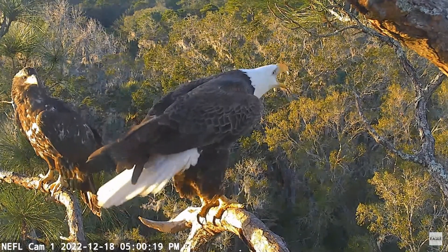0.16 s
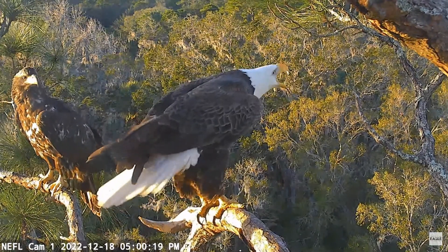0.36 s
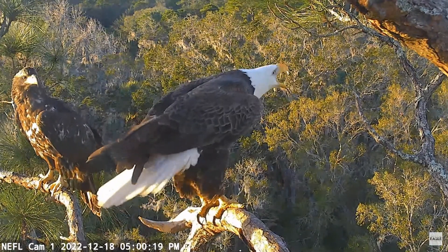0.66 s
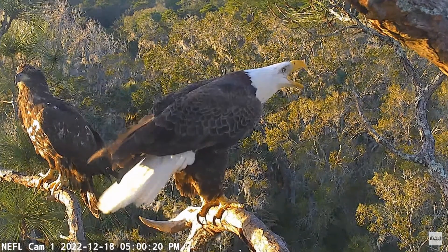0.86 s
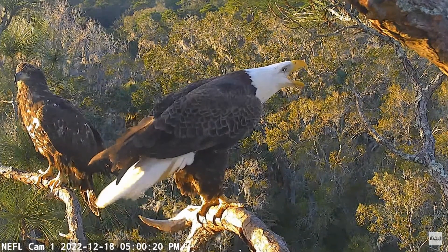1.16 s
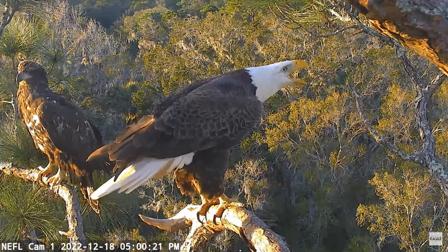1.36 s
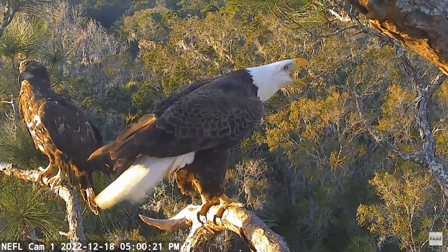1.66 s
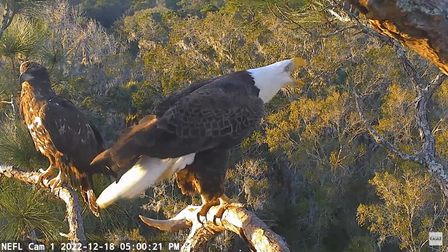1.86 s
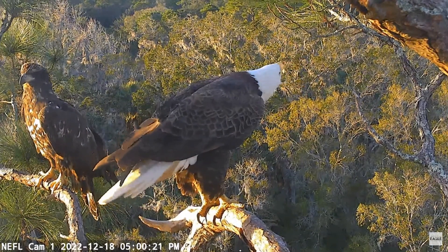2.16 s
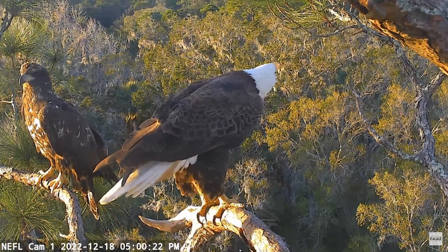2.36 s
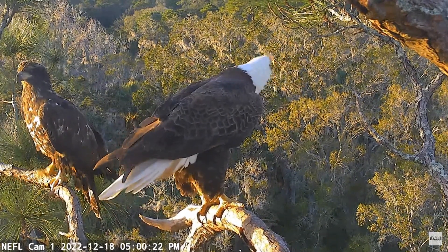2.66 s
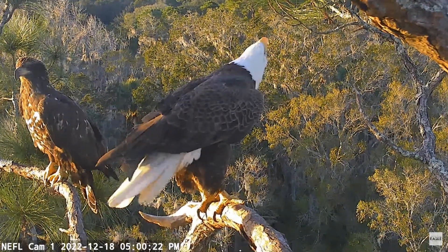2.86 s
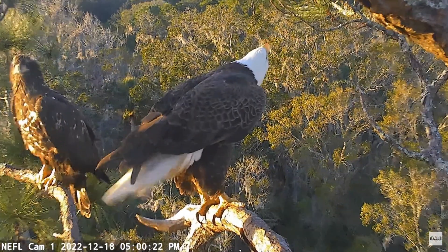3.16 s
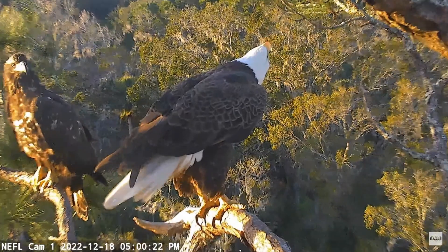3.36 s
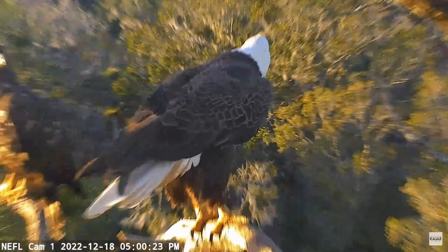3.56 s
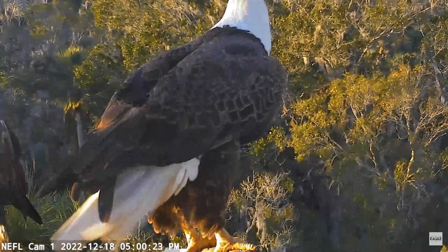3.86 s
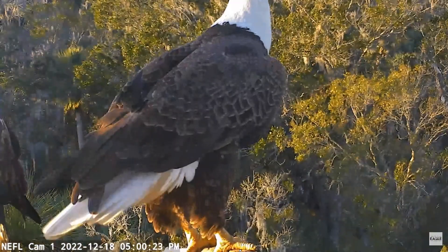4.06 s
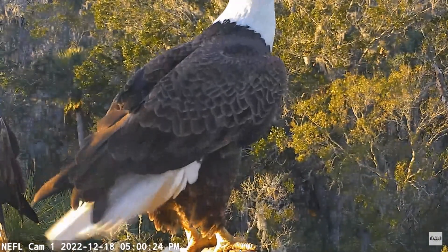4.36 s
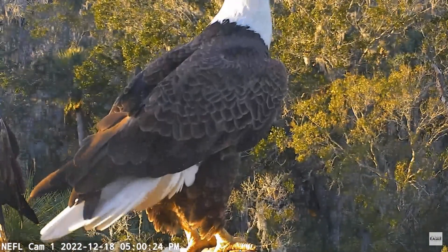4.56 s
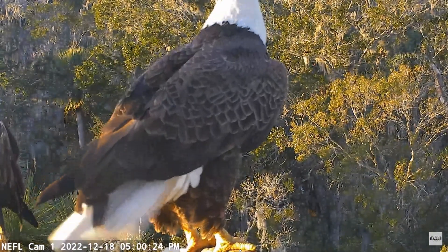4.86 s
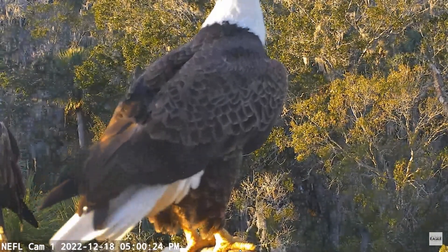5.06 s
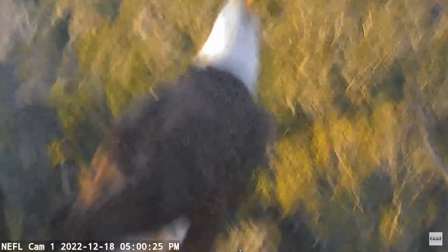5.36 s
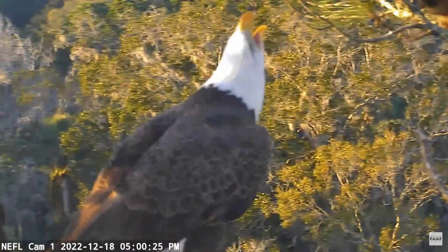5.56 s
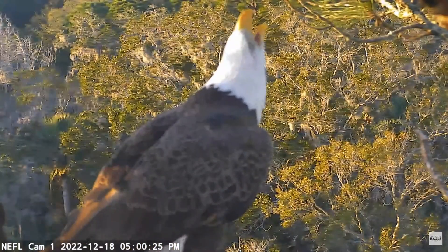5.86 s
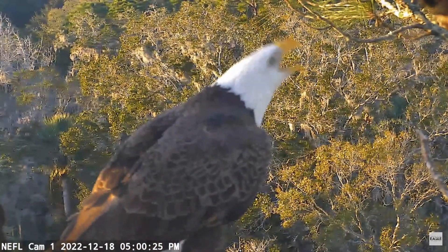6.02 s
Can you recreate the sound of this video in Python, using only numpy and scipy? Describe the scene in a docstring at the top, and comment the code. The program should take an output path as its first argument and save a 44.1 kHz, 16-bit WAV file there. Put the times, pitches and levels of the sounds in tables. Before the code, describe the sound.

Sharp chips, thin squeals and whistles from a nearby eagle turn into evenly spaced, creaky rising calls in quiet woods.

```python
"""A bald eagle calling

From a high branch close to a nest microphone come four chittering bursts, then a run of peals with the
head thrown back. The membranes of the syrinx jump between registers: sharp chips, pure whistles, thin
arching squeals, quick downward flicks and a low creaky pulsing that rings the throat.
The tree and the woods answer faintly, over a steady distant rumble."""
import sys
import numpy as np
from scipy import signal
from scipy.fft import rfft, irfft, next_fast_len
from scipy.io import wavfile

SR = 44100
rng = np.random.default_rng(int(sys.argv[2]) if len(sys.argv) > 2 else 0)


def write(x):
    x = np.atleast_2d(x).T
    wavfile.write(sys.argv[1], SR, np.round(np.clip(x, -1, 1) * 32767).astype(np.int16))


N = 272979
TIME = np.arange(N) / SR

# thin squeals: (start [s], length [s], middle pitch [Hz], level [dB], closing flick [relative dB])
SQUEALS = [(0.352, 0.062, 7450, -18, -14), (0.451, 0.056, 6950, -19.5, -5),
           (0.581, 0.023, 5000, -29.5, -11.5), (1.317, 0.029, 5950, -23, -11.5),
           (2.215, 0.046, 6550, -18.5, -2.5), (2.317, 0.05, 6300, -22.5, -13),
           (2.439, 0.029, 5900, -32, -26), (3.329, 0.075, 6930, -23.5, -17), (3.467, 0.011, 6500, -21, -28),
           (3.474, 0.026, 6500, -25.5, -22), (3.562, 0.031, 5800, -27.5, -28),
           (3.614, 0.03, 5350, -17.5, -29), (5.517, 0.016, 6550, -15, -20)]


def from_db(db):
    """Amplitude ratio of a level in decibels."""
    return 10 ** (np.asarray(db) / 20)


def rms_one(x):
    """Normalisation to unit rms."""
    return x / np.sqrt(np.mean(x ** 2) + 1e-20)


def at_hz(points, hz):
    """Interpolation of (frequency [Hz], value) points on a log-frequency axis."""
    points = np.array(points)
    return np.interp(np.log(np.maximum(hz, 1)), np.log(points[:, 0]), points[:, 1])


def butter(x, order, edge_hz, kind="low"):
    """Filtering with a maximally flat passband."""
    return signal.sosfilt(signal.butter(order, edge_hz, kind, fs=SR, output="sos"), x)


def noise(spectrum):
    """Spectral shaping of white noise, at unit rms."""
    size = next_fast_len(N, real=True)
    gain = from_db(at_hz(spectrum, np.fft.rfftfreq(size, 1 / SR)))
    return rms_one(irfft(rfft(rng.standard_normal(size)) * gain, size)[:N])


def waver(rate_hz):
    """Random modulation: low-passed noise at unit rms."""
    return rms_one(butter(rng.standard_normal(N + SR), 2, rate_hz)[SR:])


def resonate(x, hz, width_hz):
    """A damped resonator with unit gain at its peak."""
    r = np.exp(-np.pi * width_hz / SR)
    feedback = [1, -2 * r * np.cos(2 * np.pi * hz / SR), r * r]
    return signal.lfilter(np.array([1, 0, -1]) * (1 - r * r) / 2, feedback, x + 1e-18)


def span(start, length):
    """Time window of an event, at least 3 ms: its samples and the progress 0-1 through them."""
    i = np.arange(max(round(start * SR), 0), min(round((start + max(length, .003)) * SR), N))
    return i, np.linspace(0, 1, len(i))


def swell(u, peak):
    """Amplitude envelope: a rounded rise to a peak and a fall to silence."""
    return np.sin(np.pi / 2 * np.interp(u, [0, np.clip(peak, .1, .92), 1], [0, 1, 0]))


def background(rumble_db=-36.5, swell_db=2.0, hiss_db=-47):
    """Ambient noise: distant rumble, soft hiss and narrow noise bands heard as faint tones."""
    # spectra of the woods: (frequency [Hz], relative density [dB])
    rumble_spectrum = [(18, -90), (30, -59), (70, -23), (178, 0), (244, 0.5), (275, 1.5), (413, -3.5),
                       (495, -12.5), (639, -9.5), (778, -13.5), (851, -10), (1000, -21.5), (1100, -35),
                       (1430, -37), (2420, -120)]
    hiss_spectrum = [(590, -47), (1000, -61), (1190, -11), (1400, -13), (1580, -2), (1900, -9), (2150, -15),
                     (2320, -17), (2640, -12), (3550, -16.5), (5490, -17), (6840, -19), (13000, -29.5),
                     (13600, -52)]
    # steady tones: (frequency [Hz], resonator bandwidth [Hz], level [dB])
    tone_bands = [(188.6, 24, -51.5), (1275, 354, -45.5), (12980, 220, -63.5)]
    rumble = from_db(rumble_db + swell_db * waver(4.4)) * noise(rumble_spectrum)
    tones = sum(from_db(db) * rms_one(resonate(resonate(rng.standard_normal(N), hz, width), hz, width))
                for hz, width, db in tone_bands)
    return rumble + from_db(hiss_db) * noise(hiss_spectrum) + tones


def chips(ends_ratio=1.045, peak=0.067, scoop_lead_s=0.0099, scoop_s=0.012, scoop_hz=(2540, 2444, 2600)):
    """Fast onsets: arcs for sharp throbbing chips, each entered by a soft scoop from below."""
    # (start [s], length [s], pitch [Hz], level [dB], 2nd harmonic [relative dB], roughness [0-1])
    calls = [(0.054, 0.028, 3346, -10, -14, 0.29), (1.676, 0.045, 3426, -4, -11.5, 0.1),
             (1.822, 0.032, 3330, -7, -18, 0.18), (3.795, 0.037, 3424, -7, -14, 0.12),
             (3.955, 0.039, 3110, -21.5, -23, 0.39), (5.669, 0.046, 3446, -5, -14, 0.23),
             (5.826, 0.028, 3270, -6, -13, 0.16)]
    arcs = []
    for start, length, hz, db, second_db, rough in calls:
        ends = hz * ends_ratio
        arcs.append((start - scoop_lead_s, scoop_s, db - 20, scoop_hz, 0.82, second_db, rough))
        arcs.append((start, length, db, (ends, hz, ends), peak, second_db, rough))
    return arcs


def syrinx(arcs, tremor_hz=18, jitter_hz=130, throb_rate_hz=125, buzz_rate_hz=870, flutter_db=6.0):
    """Membrane oscillation: each arc of pitch is a harmonic tone, modulated and breathier when rough."""
    # air rushing with the voice: (frequency [Hz], relative density [dB])
    rush_spectrum = [(200, -37), (900, 7.5), (1600, 0), (2200, -19), (3100, 10), (4400, 20), (5100, 7),
                     (6500, 11.5), (9000, 9.5), (11000, -35), (13000, -12), (16000, -26)]
    # 3rd harmonic in each register: (pitch [Hz], relative level [dB])
    third_harmonic = [(1400, -38), (1850, -22), (2300, -22), (3000, -34.5), (3500, -34), (4400, -61),
                      (5800, -60)]
    out, shake, flutter, air = np.zeros(N), waver(420), waver(670), noise(rush_spectrum)
    # even the purest whistle trembles a little in pitch and in the strength of its overtones
    tremor = waver(79)
    closing = from_db(flutter_db * tremor)
    for start, length, level_db, pitches, peak, second_db, rough in arcs:
        i, u = span(start, length)
        age, effort = TIME[i] - start, swell(u, peak)
        pitch = np.polyval(np.polyfit([0, .5, 1], pitches, 2), u)
        phase = 2 * np.pi * np.cumsum(pitch + tremor_hz * tremor[i] + jitter_hz * rough * shake[i]) / SR
        third_db = at_hz(third_harmonic, pitches[1])
        overtones = sum(from_db(db) * np.sin(k * phase) * (k * pitch < SR / 2)
                        for k, db in enumerate([second_db, third_db, third_db - 14, third_db - 28], 2))
        # harder blowing closes the membranes more sharply and brightens the note
        tone = np.sin(phase) + np.sqrt(effort) * closing[i] * overtones
        throb = 1 - 0.33 * np.tanh(7 * rough) * np.cos(2 * np.pi * throb_rate_hz * age)
        # a slower flapping of the membranes adds sidebands and rasp
        flapping = np.sin(2 * np.pi * buzz_rate_hz * age + shake[i])
        rasp = 1 + rough * (0.41 * flapping + 0.95 * flutter[i])
        breath = (from_db(-14) * rough + from_db(-40)) * air[i]
        out[i] += from_db(level_db) * effort * (tone * throb * rasp + breath)
    return out


def surroundings(voice, near_db=-18, near_t60=0.11, woods_db=-24):
    """Scattering and reverberation: trunk and branches answer at once, the woods with a faint tail."""
    # reverberation of the woods: (frequency [Hz], time to fall 60 dB [s])
    woods_t60 = [(300, 0.43), (1500, 1.5), (2900, 1.06), (3500, 1.33), (4600, 0.76), (7000, 1.1),
                 (14000, 0.71)]
    t = TIME[:SR]
    near = rms_one(rng.standard_normal(SR) * from_db(-60 * t / near_t60) * (t > .005))
    woods, edges = 0, np.geomspace(150, 16000, num=13)
    for low, high in zip(edges, edges[1:]):
        band = butter(rng.standard_normal(SR), 4, [low, high], "band")
        woods = woods + band * from_db(-60 * t / at_hz(woods_t60, np.sqrt(low * high)))
    response = from_db(near_db) * near + from_db(woods_db) * rms_one(woods * (t > .02))
    return signal.fftconvolve(voice, response / np.sqrt(SR))[:N]


def whistles(arch_per_s2=13, peak_later_per_s=3.2):
    """Sustained oscillation: arcs for held whistles; a longer one arches more and peaks later."""
    # (start [s], length [s], pitch [Hz], glide [Hz], level [dB], 2nd harmonic [relative dB],
    #  roughness [0-1])
    calls = [(0.219, 0.015, 2410, 87, -22.5, -36, 0), (0.226, 0.025, 1380, -150, -20, -20, 0.13),
             (0.305, 0.036, 3410, 1316, -26.5, -7, 0.6), (0.327, 0.045, 3020, 130, -4, -15, 0.02),
             (0.697, 0.023, 3050, -600, -20.5, -7.5, 0.16), (1.156, 0.03, 2310, 303, -14.5, -17, 0.37),
             (1.182, 0.022, 2994, -5, 1.5, -21, 0.05), (1.236, 0.041, 3094, 335, -5, -19.5, 0.04),
             (1.329, 0.059, 4100, 117, -20.5, -8.5, 0.36), (1.387, 0.04, 3920, 500, -26, -10, 0.33),
             (1.42, 0.064, 4360, 17, -11.5, -19, 0.29), (1.466, 0.024, 3370, -150, -7, -27, 0.16),
             (1.543, 0.028, 2235, 5, -14, -7, 0.22), (1.545, 0.043, 4410, 150, -15, -19, 0.48),
             (1.573, 0.027, 3400, -20, -15, -30, 0.03), (1.667, 0.031, 4410, -82, -19, -29, 0.15),
             (1.958, 0.034, 2340, 281, -34.5, -30, 0.4), (1.978, 0.024, 1326, -150, -16, -21, 0),
             (2.06, 0.03, 3070, 347, -18, -12.5, 0.14), (2.085, 0.016, 3810, 202, -15.5, -27, 0),
             (2.088, 0.024, 2937, 28, -3.5, -39, 0.05), (2.127, 0.035, 2930, 20, -4, -28, 0),
             (2.152, 0.033, 3090, 396, -1, -20, 0.03), (2.369, 0.01, 3047, 100, -11, -16, 0.07),
             (2.468, 0.032, 2475, 27, -12, -11.5, 0.18), (2.577, 0.042, 2096, 180, -12.5, -17.5, 0.09),
             (3.299, 0.0262, 2980, 670, -23.5, -7, 0.39), (3.321, 0.019, 2783, -120, -11, -6.5, 0.21),
             (3.385, 0.068, 3361, -17, -3.5, -26, 0.01), (3.429, 0.045, 3276, 76, -15.5, -14, 0.13),
             (3.497, 0.0076, 5800, -750, -7.5, -38, 0.07), (3.506, 0.02, 5430, -80, -9, -51, 0.33),
             (3.499, 0.067, 4580, 16, -11.5, -17, 0.07), (3.59, 0.039, 2973, 107, -10, -8, 0.16),
             (3.623, 0.077, 4620, 24, -21, -25, 0.7), (3.665, 0.014, 3510, -180, -12.5, -28, 0.06),
             (3.7, 0.037, 2888, -62, -10, -19, 0.08), (3.782, 0.026, 1840, 152, -16.5, -7, 0.23),
             (5.387, 0.093, 4320, -10, -1, -24, 0.02), (5.526, 0.0085, 5680, -500, -4, -34, 0),
             (5.533, 0.043, 4444, 116, 0, -26.5, 0.1), (5.662, 0.013, 4380, -70, -12, -23, 0.1)]
    arcs = []
    for start, length, hz, glide_hz, db, second_db, rough in calls:
        ends = hz * (1 - arch_per_s2 * length ** 2)
        pitches = (ends - glide_hz / 2, hz, ends + glide_hz / 2)
        peak = 0.18 + peak_later_per_s * length
        arcs.append((start, length, db, pitches, peak, second_db, rough))
    return arcs


def squeals(peak=0.76, second_db=-27.5, rough=0.28, wisps=2, wisp_s=0.018, wisp_db=-4.5):
    """Biphonation: one side of the syrinx arches a squeal, the other weaves steep wisps through it."""
    arcs, colour = [], (peak, second_db, rough)
    for start, length, hz, db, _ in SQUEALS:
        arcs.append((start, length, db, (0.86 * hz, hz, 0.69 * hz), *colour))
        for k in range(wisps):
            middle = start + length * (k + rng.random()) / wisps
            pitches = hz * np.array([0.88, 1.06, 0.764]) * (1 + 0.079 * rng.standard_normal())
            arcs.append((middle - wisp_s / 2, wisp_s, db + wisp_db, pitches, *colour))
    return arcs


def pulse_register(body_growth_db_per_s=332, mutters=5, mutter_s=0.007, spread_db=3.5):
    """Creaks and mutters of the pulse register: (start [s], length [s], throat, body, flick [dB])."""
    # clear creaks: (start [s], length [s], throat [relative dB], leading flick [relative dB])
    clear_creaks = [(0.537, 0.011, -21.5, -16), (0.619, 0.0067, -25, -11), (1.295, 0.016, -29.5, -13),
                    (1.385, 0.0068, -23.5, -13), (1.455, 0.0135, -28, 1.5), (1.634, 0.0035, -35.5, -37),
                    (2.3, 0.0035, -22, -13.5), (2.378, 0.0037, -25.5, -24), (2.69, 0.015, -37, -40),
                    (2.809, 0.0078, -37.5, -39), (3.438, 0.0038, -27, -31), (3.518, 0.0095, -28.5, -24),
                    (4.191, 0.0076, -24.5, -23), (4.207, 0.014, -18, -16), (4.235, 0.012, -23.5, -13),
                    (4.259, 0.0082, -24.5, -11), (4.283, 0.004, -28, -10.5), (4.304, 0.015, -33.5, -11.5),
                    (4.321, 0.024, -23.5, -24), (4.514, 0.0029, -20, -6.5), (4.53, 0.0048, -25, -26),
                    (4.733, 0.01, -21, -9), (4.75, 0.018, -23, -26), (4.783, 0.0063, -21, -11.5),
                    (4.8, 0.015, -21.5, -15), (4.818, 0.012, -27.5, -31), (5.066, 0.014, -34.5, -37),
                    (5.091, 0.0094, -22, -8), (5.115, 0.0063, -21, -9), (5.132, 0.023, -21.5, -11),
                    (5.379, 0.0077, -24, -5), (5.405, 0.004, -20.5, -7), (5.419, 0.023, -23.5, -29),
                    (5.647, 0.0035, -25.5, -22), (5.668, 0.0071, -21, -5), (5.685, 0.027, -24, -28),
                    (5.921, 0.008, -29.5, -23), (5.945, 0.0078, -22.5, -14), (5.96, 0.032, -23.5, -30)]
    # the thick of each burst, where soft creaks mutter: (start [s], end [s])
    bursts = [(0.39, 0.57), (1.29, 1.425), (2.2, 2.41), (3.36, 3.54)]
    rows = [(start, length, db, db - 7 + body_growth_db_per_s * length, flick_db)
            for start, length, db, flick_db in clear_creaks]
    for start, end in bursts:
        for k in range(mutters):
            time = start + (end - start) * (k + rng.random()) / mutters
            db = spread_db * rng.standard_normal()
            rows.append((time, mutter_s, db - 34, db - 32.5, db - 12.5))
    return rows


def flicks(pulsing, length=0.0093, top_hz=4000, bottom_hz=2500, lead_s=0.0055, trim_db=-8.5, grit=0.51):
    """Register breaks: the pitch plunges at the end of each squeal and just ahead of each creak."""
    after_squeals = [(start + duration, db) for start, duration, *_, db in SQUEALS]
    before_creaks = [(start - lead_s, db) for start, *_, db in pulsing]
    out, flutter = np.zeros(N), waver(1000)
    for centre, db in after_squeals + before_creaks:
        i, u = span(centre - length / 2, length)
        pitch = (top_hz + (bottom_hz - top_hz) * u) * (1 + 0.021 * rng.standard_normal())
        envelope = from_db(db + trim_db) * swell(u, 0.54) ** 2 * (1 + grit * flutter[i])
        out[i] += envelope * np.sin(2 * np.pi * np.cumsum(pitch) / SR)
    return butter(out, 6, 4300)


def creaks(pulsing, first_hz=410, sag=.38, jitter=0.098, rasp_db=-15, body_lag_s=0.004, dip_hz=1040):
    """Source and filter: slack membranes beat in uneven pulses that ring the throat."""
    # throat resonances: (frequency [Hz], bandwidth [Hz], relative gain [dB])
    formants = [(910, 780, -15.5), (1450, 171, 4.5), (2598, 136, -7.5), (6200, 1600, -12)]
    pulses, body, shake, air = np.zeros(N), np.zeros(N), waver(250), rng.standard_normal(N)
    for start, length, throat_db, body_db, _ in pulsing:
        i, u = span(start - .001, length + body_lag_s)
        # a long creak sags in pitch as the air runs out
        pitch = first_hz * (1 - sag * min(length / 0.027, 1) * u ** 2.2) * (1 + jitter * shake[i])
        cycles = np.cumsum(pitch) / SR + .5
        beats = np.diff(np.floor(cycles), prepend=0) * np.sqrt(SR / first_hz)
        # the sharp beats stop first, the low swing goes on a little longer
        pressure = np.sqrt(swell((TIME[i] - TIME[i[0]]) / (length + 0.003), peak=0.43))
        pulses[i] += from_db(throat_db) * pressure * (beats + from_db(rasp_db) * air[i])
        phase = 2 * np.pi * cycles
        swing = np.cos(phase) + from_db(-12) * np.cos(2 * phase)
        body[i] += 2 * from_db(body_db) * swell(u, peak=0.6) * swing
    throat = from_db(21.0) * sum(from_db(db) * resonate(pulses, hz, width) for hz, width, db in formants)
    # a dip near 1 kHz hollows the creaks, and their top is softened
    hollowed = signal.lfilter(*signal.iirnotch(dip_hz, Q=2.8, fs=SR), body + throat)
    return butter(hollowed, 4, [150, 3900], "band")


def peals(slide_lead_s=0.0066, slide_s=0.0167, slide_db=-32.5, low_s=0.017, climb_delay_s=0.007,
          overlap_s=0.0067, top_s=0.013):
    """Register jumps: arcs for peals that climb three overlapping steps after a faint slide."""
    # (start [s], time from climb to top step [s], low step [dB], climb [dB], top step [dB])
    calls = [(4.144, 0.025, -22.5, -12, -8), (4.445, 0.042, -6, -11, -35), (4.688, 0.029, -6, -12.5, -19),
             (5.023, 0.025, -13.5, -10.5, -1), (5.312, 0.023, -8.5, -9.5, 0.5),
             (5.598, 0.025, -12.5, -11.5, -7), (5.874, 0.025, -16.5, -10.5, -29),
             (6.183, 0.025, -22, -20, -34)]
    # shape of each part: ((start, middle, end pitch [Hz]), place of the peak [0-1],
    #  2nd harmonic [relative dB], roughness [0-1])
    slide = ((1490, 1650, 1900), 0.71, -14.5, 0.24)
    low_step = ((1810, 1830, 1990), 0.5, -12.5, 0.11)
    climb = ((2150, 2330, 2445), 0.29, -22, 0.19)
    top_step = ((3110, 2868, 2990), 0.36, -25.5, 0.068)
    arcs = []
    for start, climb_s, low_db, climb_db, top_db in calls:
        arcs += [(start - slide_lead_s, slide_s, slide_db, *slide),
                 (start, low_s, low_db, *low_step),
                 (start + climb_delay_s, climb_s + overlap_s, climb_db, *climb),
                 (start + climb_delay_s + climb_s, top_s, top_db, *top_step)]
    return arcs


def scene(channel_noise_db=-64, treble_hz=13000):
    """Superposition at one microphone, which feeds both channels, each with a trace of noise."""
    # noise of each channel: (frequency [Hz], relative density [dB])
    channel_spectrum = [(30, -21), (120, -9.5), (330, 13), (600, 1), (1500, -33), (4000, -16.5),
                        (12000, -39), (15000, -51)]
    pulsing = pulse_register()
    eagle = syrinx(chips() + whistles() + squeals() + peals()) + flicks(pulsing) + creaks(pulsing)
    eagle = butter(eagle, 2, treble_hz)  # the highest overtones are lost on the way
    sound = eagle + surroundings(eagle) + background()
    return np.array([sound + from_db(channel_noise_db) * noise(channel_spectrum) for _ in range(2)])


def record(dry, asymmetry=.0015, cutoff_hz=15600):
    """Soft saturation and band limiting: the loudest notes overload the input a little, unevenly."""
    bent = np.tanh(dry) + asymmetry * dry ** 2
    centred = butter(bent, 2, 25, "high")
    return signal.sosfilt(signal.ellip(10, .1, 90, cutoff_hz, fs=SR, output="sos"), centred)


dry = scene()
out = record(dry)
write(out)
```